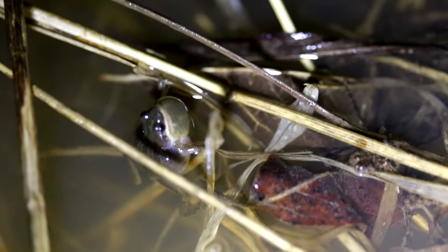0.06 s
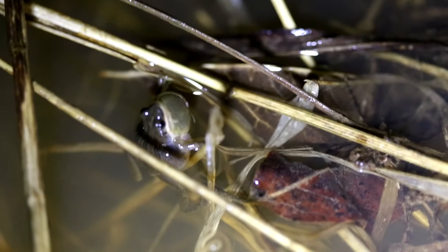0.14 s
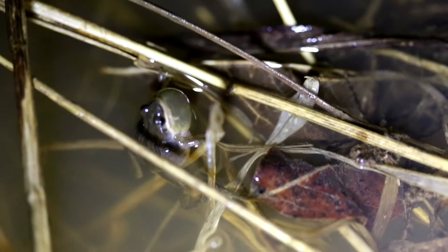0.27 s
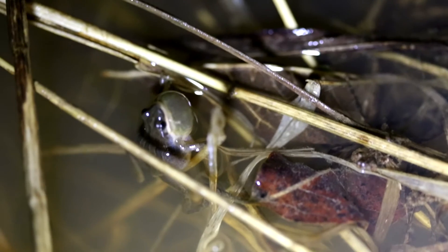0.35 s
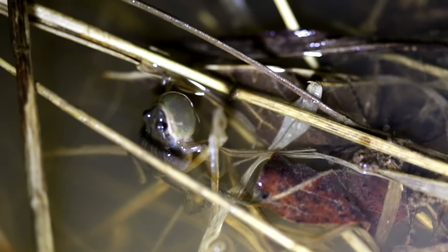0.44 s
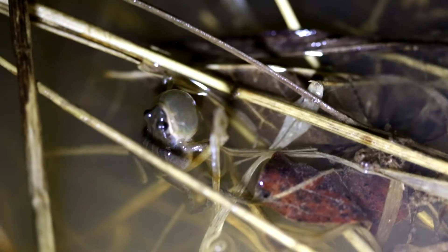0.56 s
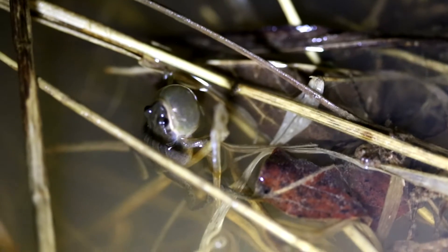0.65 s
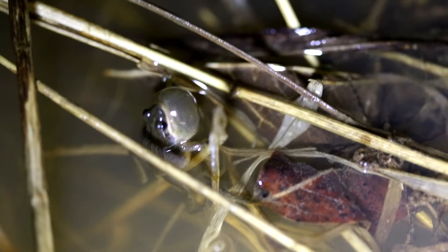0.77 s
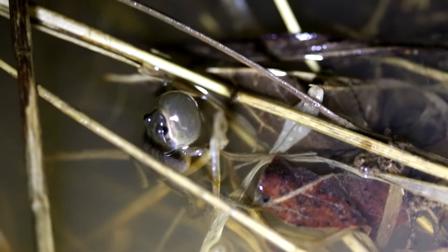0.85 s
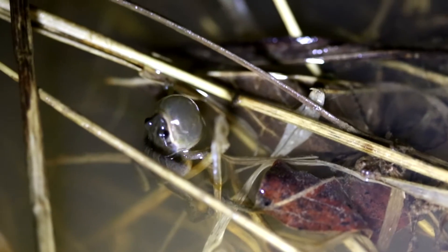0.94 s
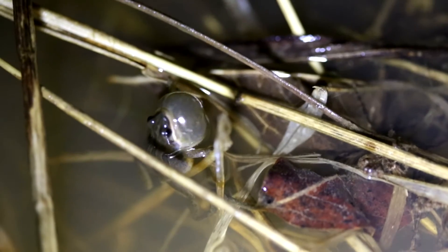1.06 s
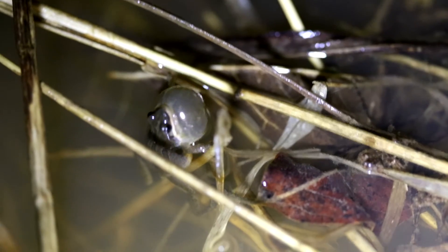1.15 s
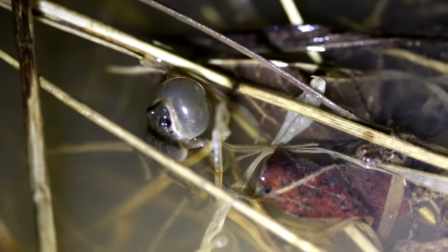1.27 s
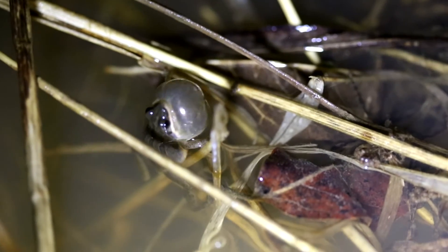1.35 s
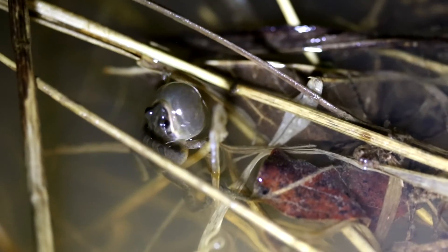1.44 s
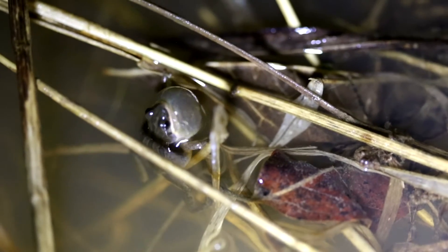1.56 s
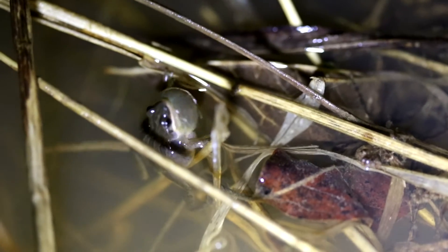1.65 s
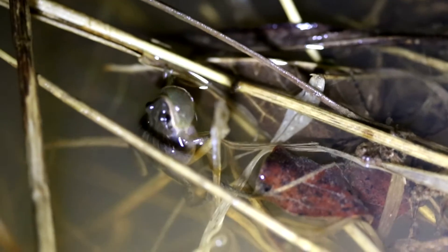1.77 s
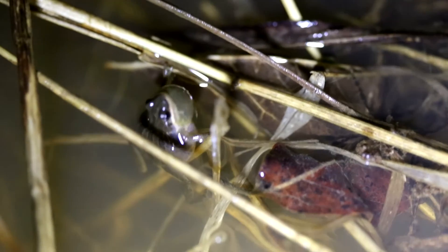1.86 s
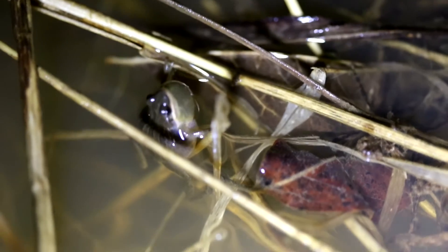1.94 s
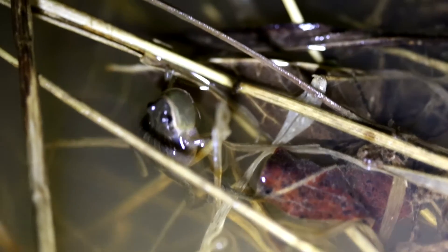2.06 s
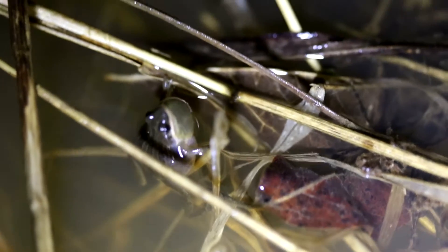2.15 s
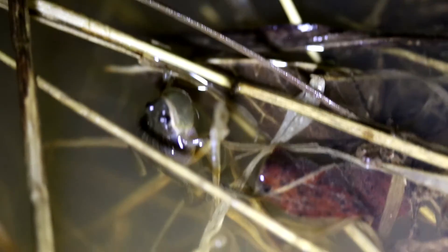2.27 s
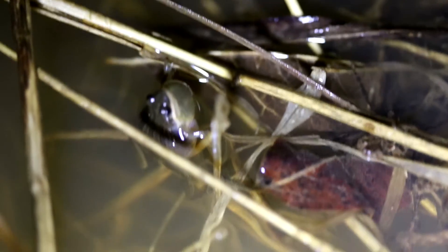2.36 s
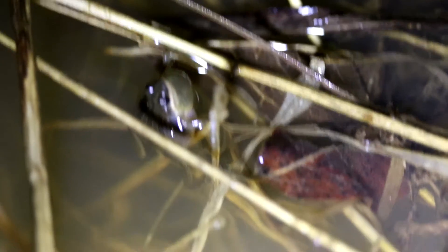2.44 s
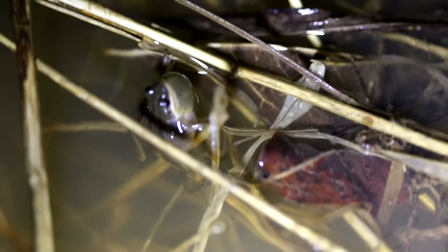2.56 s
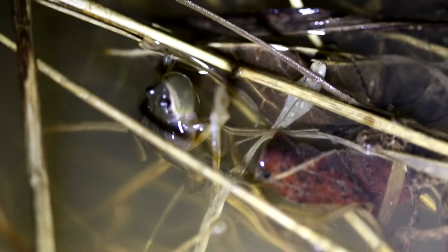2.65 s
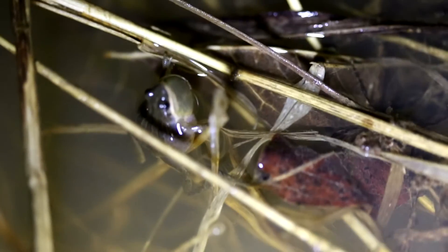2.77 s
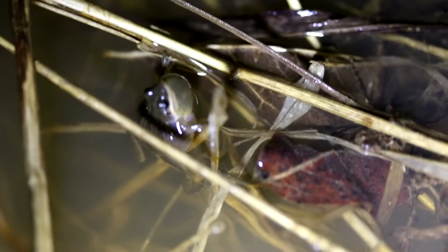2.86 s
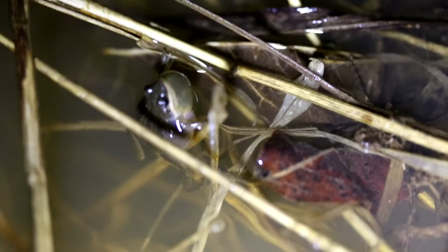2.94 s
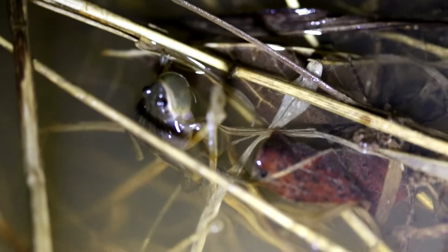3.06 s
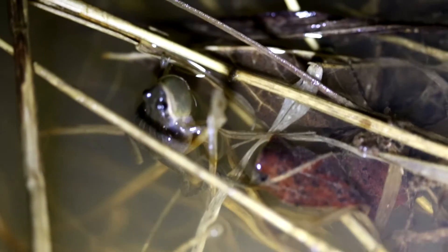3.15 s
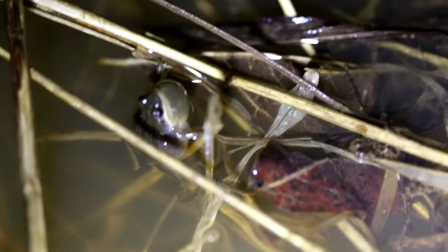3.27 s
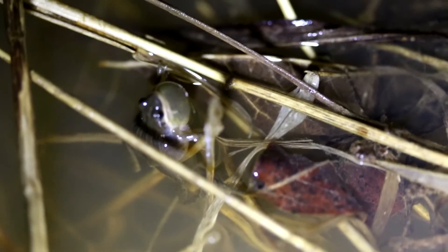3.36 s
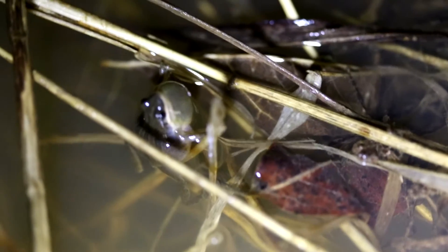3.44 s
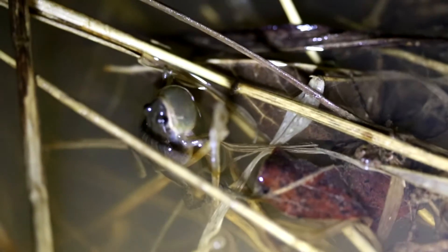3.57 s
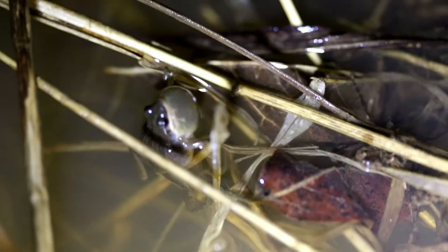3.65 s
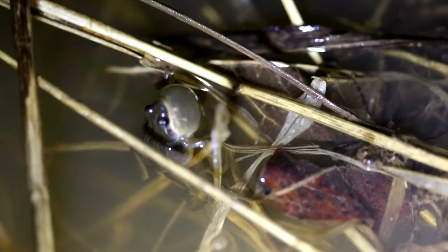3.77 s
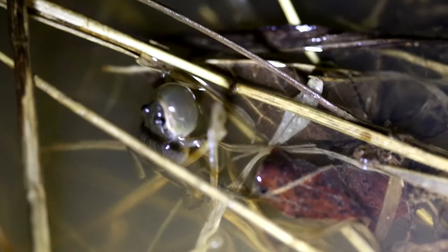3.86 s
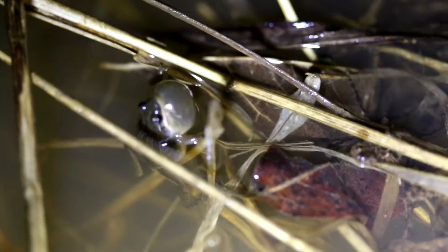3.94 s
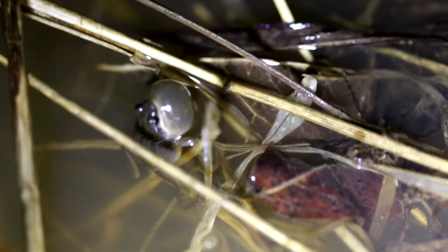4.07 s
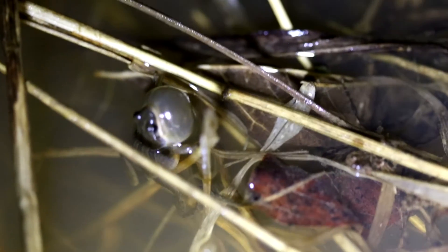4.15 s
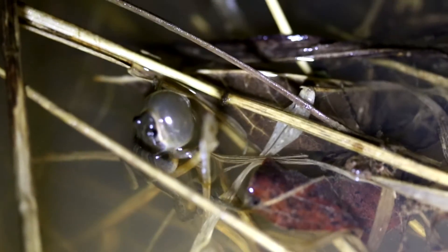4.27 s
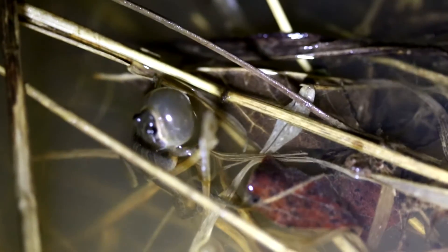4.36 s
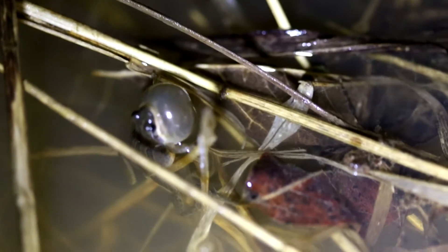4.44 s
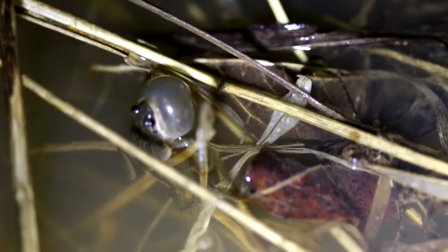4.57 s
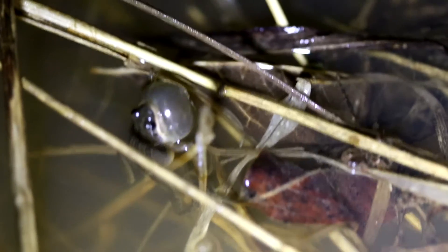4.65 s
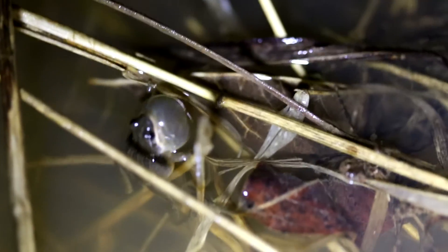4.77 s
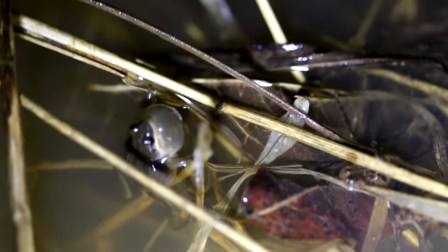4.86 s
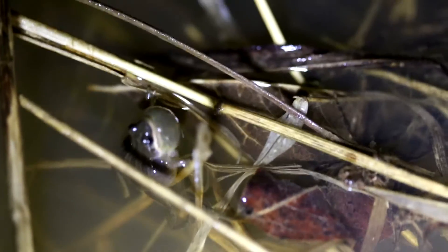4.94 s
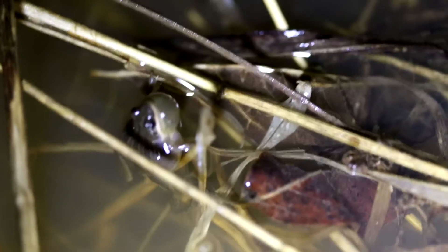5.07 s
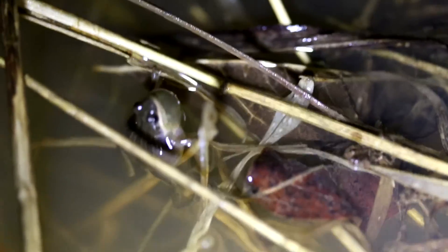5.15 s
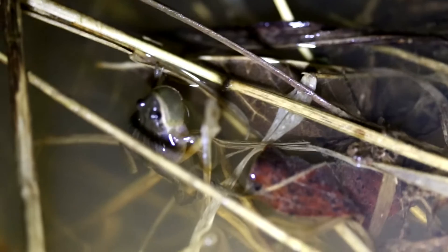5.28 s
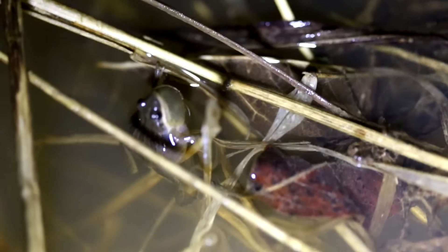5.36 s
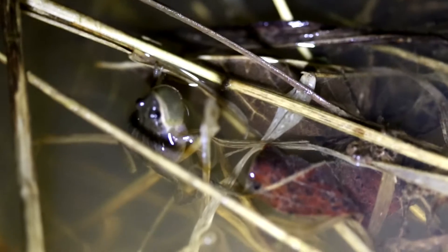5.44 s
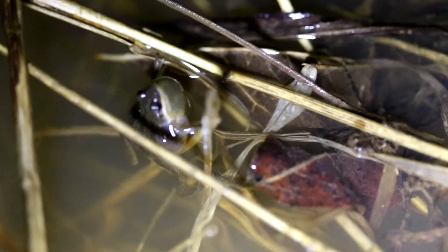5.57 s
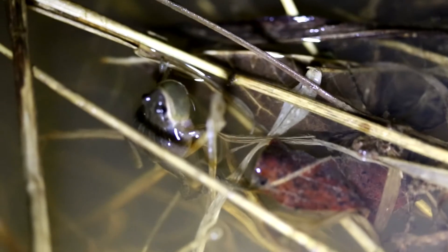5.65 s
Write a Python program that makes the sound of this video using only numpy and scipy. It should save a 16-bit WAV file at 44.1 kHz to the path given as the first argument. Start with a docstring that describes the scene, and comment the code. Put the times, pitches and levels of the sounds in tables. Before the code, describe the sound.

At a pond at night, one loud frog ratchets out two creaky rising trills while neighbours click and small peepers whistle behind.

```python
"""Night at a pond: a chorus frog close to the microphone gives two slowing trills of clicks, each click
a brief buzz of vocal folds with a ringing sac. Neighbours a few metres off click their own trills,
peepers whistle rising notes from gliding partials, and far clicks blur into a haze of shaped noise.
Light wind rumbles on the microphone, with one soft thump, and its electronics hiss."""
import sys
import numpy as np
from scipy import signal
from scipy.io import wavfile
from scipy.ndimage import uniform_filter1d

SR = 44100
rng = np.random.default_rng(int(sys.argv[2]) if len(sys.argv) > 2 else 0)


def master(y):
    """Save y as 16-bit WAV."""
    cut = np.clip(np.atleast_2d(y).T, -1, 1)
    pcm = np.round(cut * 32767)  # scale
    wavfile.write(sys.argv[1], SR, pcm.astype(np.int16))


N = 251811


def gain_of(db):
    """Amplitude factor of a level in dB."""
    return 10 ** (np.asarray(db) / 20)


def evened(x):
    """The signal scaled to rms 1."""
    return x / np.sqrt(np.mean(x ** 2) + 1e-20)


def phase_of(hz):
    """Phase in radians of an oscillator that follows a frequency track."""
    return 2 * np.pi * np.cumsum(hz) / SR


def read(points, hz):
    """Values of a curve of (Hz, dB) points, straight over log frequency."""
    point_hz, value = np.transpose(points)
    return np.interp(np.log(hz + 1), np.log(point_hz + 1), value)


def add(mix, s, sound):
    """Lay a sound into the mix from s seconds on, cut at the end of the mix."""
    part = mix[max(round(s * SR), 0):][:len(sound)]
    part += sound[:len(part)]


def noise(spectrum, size, patchy_db):
    """Noise of rms 1 from random short-time spectra, its level drifting in patches of time and pitch."""
    frames = 4 * N // size + 5
    hz = np.fft.rfftfreq(size, 1 / SR)
    real, imaginary, patches = rng.standard_normal((frames, len(hz), 3)).T
    patches = uniform_filter1d(patches, size=5, axis=0)  # across frequency
    patches = evened(uniform_filter1d(patches, size=6, axis=1))  # across time
    level_db = read(spectrum, hz)[:, None] + patchy_db * patches
    z = (real + 1j * imaginary) * gain_of(level_db)
    return evened(signal.istft(z, nperseg=size, noverlap=3 * size // 4)[1][:N])


def hiss():
    """Steady noise of the microphone's electronics."""
    # Spectrum of the hiss. Each row: frequency in Hz, relative density in dB per Hz.
    spectrum = [(150, 14), (300, 8), (700, 8.4), (9000, 3), (13000, 4.5), (16000, 4)]
    return gain_of(-67.5) * noise(spectrum, size=512, patchy_db=2.0)


def wind():
    """Lumpy low rumble of moving air on the microphone, following the gusts."""
    # Spectrum of the rumble. Each row: frequency in Hz, relative density in dB per Hz.
    spectrum = [(11, -28.5), (18, 0), (38, 7.5), (90, 6.5), (121, -3), (217, -20.5), (400, -33),
                (520, -61.5), (880, -120)]
    # Strength of the gusts. Each row: time in seconds, level in dB.
    gusts = [(0.0, -60), (0.301, -73), (1.3, -65), (1.99, -59), (2.05, -66), (2.48, -58), (2.58, -75.5),
             (2.65, -57.5), (3.04, -54), (3.07, -64.5), (4.71, -62), (5.01, -56.5), (5.14, -65.5),
             (5.45, -65.5), (5.52, -53.5), (5.66, -62), (5.71, -61)]
    gust_db = np.interp(np.arange(N) / SR, *np.transpose(gusts))
    return noise(spectrum, size=1024, patchy_db=5.5) * gain_of(gust_db)


def thump():
    """One soft low thump: a decaying sine that falls in pitch."""
    # One row: level in dB, start in Hz, end in Hz, 60 dB decay time in seconds.
    knock = (-46, 280, 57, 0.25)
    db, high_hz, low_hz, t60 = knock
    out, t = np.zeros(N), np.arange(6000) / SR
    hz = low_hz + (high_hz - low_hz) * np.exp(-t / .018)
    level = gain_of(db - 60 * t / t60) * (1 - np.exp(-t / 0.0038))
    add(out, 5.498, level * np.sin(phase_of(hz)))
    return out


def haze():
    """The farthest frogs, blurred into patchy noise around the pitch of their sacs."""
    # Spectrum of the haze. Each row: frequency in Hz, relative density in dB per Hz.
    spectrum = [(410, -81), (700, -44), (934, -57), (1170, -18), (1400, -18), (2320, -36), (2720, 8.5),
                (2900, 6), (3400, -12), (3910, -28), (4840, -18.5), (9000, -47.5), (11700, -68.5),
                (19800, -120)]
    return gain_of(-47.5) * noise(spectrum, size=256, patchy_db=5.0)


def click(db, hz, low_db, high_db, hold, luck, taut_hz, ring_t60, mouth_hz):
    """The folds vibrate a few cycles, gliding from taut_hz to half the ring; the sac rings on at hz."""
    # Partials of the folds. Each row: multiple of the fold rate, relative level in dB.
    partials = [(3, -4.5), (4, -16), (5, -30.5), (6, -39.5), (7, -47), (8, -34.5), (9, -42)]
    t = np.arange(1300) / SR
    excess_hz = taut_hz - hz / 2
    taut = np.exp(-(t / (hold + 0.000069)) ** 2)
    turns = phase_of(hz / 2 + excess_hz * taut)
    ring = phase_of(hz + 1.5 * excess_hz * np.exp(-t / (0.00027 + 0.3 * hold)))
    after = np.maximum(t - hold, 0)
    folds = (1 - np.exp(-t / 0.00051)) * gain_of(-60 * after / 0.0044)
    sac = (1 - np.exp(-t / 0.00034)) ** 1.82 * gain_of(-60 * after / ring_t60)

    # the balance of overtones varies with luck
    overtones = 0
    for (multiple, partial_db), w in zip(partials, luck):
        overtones = overtones + gain_of(partial_db + 6 * (w - .5)) * np.sin(multiple * turns + 2 * np.pi * w)
    # wet folds flutter: the overtones are rough
    rough = 1 + .5 * np.sin(2 * np.pi * (700 * t * (1 + luck[1]) + luck[2]))
    # the folds part with a dry snap, falling from 6200 to 3600 Hz
    snap_hz = 6200 - 2600 * np.minimum(t / 0.0004, 1)
    snap = .5 * np.exp(-t / 0.00037) * np.sin(phase_of(snap_hz))
    # the mouth cavity knocks briefly
    mouth = 0.61 * np.exp(-t / 0.0019) * np.sin(2 * np.pi * mouth_hz * t + 2.47)
    mouth = mouth * (1 - np.exp(-t / 0.00056))

    low = gain_of(low_db - 2.0) * (folds * np.sin(turns) + mouth)
    high = gain_of(high_db) * (folds * rough * overtones + snap)
    body = sac * np.sin(ring) + low + high
    # a body this small sends out little below 994 Hz
    throat = signal.butter(6, 994, "high", fs=SR, output="sos")
    return gain_of(db) * signal.sosfilt(throat, body)


def far_frogs():
    """Small clicks at random times from 24 distant frogs, each with its own sac."""
    clicks_per_s = 170
    louder_db = 2.2 * np.minimum(rng.exponential(1, N), 2.5)
    size = gain_of(louder_db) * (rng.random(N) < clicks_per_s / SR)
    frog, out = rng.integers(0, 24, N), np.zeros(N)
    for k, hz in enumerate(np.linspace(2620, 3520, num=24)):
        voice = click(0, hz, low_db=-15, high_db=-14, hold=.0016, luck=rng.random(7),
                      taut_hz=.55 * hz, ring_t60=.018, mouth_hz=rng.uniform(1100, 1900))
        out += signal.oaconvolve(size * (frog == k), voice)[:N]
    return gain_of(-48) * evened(out)


def whistle(odd_db, fourth_db, start, end, start_hz, end_hz, db):
    """A clear rising note, the second partial of the folds, swelling towards its end."""
    seconds = end - start
    u = np.linspace(0, 1, int(seconds * SR))
    # the middle lies 15.43 Hz above a straight climb
    pitch = start_hz + (end_hz - start_hz) * u + 15.43 * np.sin(np.pi * u)
    waver_db = evened(uniform_filter1d(rng.standard_normal(len(u)), size=900))
    turns = phase_of(pitch / 2) + 2 * np.pi * rng.random()
    # odd partials grow up to 2800 Hz; the fourth fades above 2710 Hz
    high = (pitch - 2800) / 300
    odd_gain = gain_of(odd_db + 4 * np.minimum(high, 0) + waver_db)
    odd = odd_gain * (.5 * np.sin(turns) + np.sin(3 * turns))
    fourth_gain = gain_of(fourth_db - 9 * np.maximum(high + .3, 0) + waver_db)
    tone = np.sin(2 * turns) + odd + fourth_gain * np.sin(4 * turns)
    # 11 ms fade in, 9.1 ms fade out
    edges = np.clip(np.minimum(u * seconds / 0.011, (1 - u) * seconds / 0.0091), 0, 1)
    swell = gain_of(db + 3.2 * (u - .5) + waver_db)
    return np.sqrt(2) * swell * edges * tone  # sqrt(2): the level is an rms


def peepers():
    """Whistles of three voices, each with its own strength of partials."""
    # Voices of the peepers. Each row: odd partials in dB re whistle, fourth partial in dB re whistle
    # (both before they shift with pitch), whistles. Each whistle: start in seconds, end in seconds,
    # start in Hz, end in Hz, rms level in dB before swell and fades.
    voices = [(-27.5, -30.5, [(.78, 1.07, 2500, 3070, -35), (2.362, 2.67, 2530, 3020, -42.5),
              (2.73, 3.02, 2530, 3120, -37.5), (3.995, 4.285, 2555, 3110, -38)]),
              (-33.5, -30.5, [(0, .165, 2510, 2763, -36.5), (1.66, 1.84, 2490, 2820, -34.5),
              (2.545, 2.73, 2470, 2810, -35.5), (3.375, 3.56, 2470, 2790, -35),
              (4.2, 4.395, 2450, 2819, -35.6), (5.165, 5.365, 2495, 2815, -35.5)]),
              (-39.5, -44.5, [(0, .14, 2780, 2983, -41), (.53, .67, 2510, 2803, -41.5),
              (.58, .67, 2770, 3000, -47), (.81, .96, 2690, 3020, -39), (1.25, 1.37, 2720, 2950, -42.5),
              (1.44, 1.58, 2535, 2813, -41), (1.66, 1.78, 2720, 2942, -47), (2.29, 2.37, 2375, 2455, -62),
              (3.22, 3.38, 2535, 2884, -43), (3.62, 3.78, 2725, 3046, -44), (4.43, 4.55, 2690, 2955, -44),
              (4.46, 4.61, 2640, 2957, -45.5), (4.645, 4.79, 2505, 2773, -42.3),
              (4.65, 4.85, 2680, 2980, -43), (4.86, 4.98, 2680, 2898, -44.5),
              (5.39, 5.54, 2640, 2950, -46.5), (5.57, 5.71, 2710, 2995, -45),
              (5.595, 5.71, 2540, 2800, -42.5)])]
    out = np.zeros(N)
    for odd_db, fourth_db, whistles in voices:
        for row in whistles:
            add(out, row[0], whistle(odd_db, fourth_db, *row))
    return out


def neighbours():
    """Clicks of frogs a few metres off; the grass dulls the top."""
    # Trills of the neighbours, the ring moving evenly from first to last click. Each row: first ring
    # in Hz, last ring in Hz, fundamental in dB re ring (before a 2 dB cut in click), overtones in dB
    # re ring, clicks. Each click: start in seconds, level in dB (before a 3 dB lift).
    trills = [ (3260, 3355, -16.5, -16.5, [(.106, -21.5), (.2191, -21.5), (.314, -22)]),
              (3250, 3330, -33, -12, [(.087, -29.5), (.2064, -30.5)]),
              (3200, 3503, -12, -10, [(.136, -31.5), (.2495, -34), (.4805, -28.5), (.6117, -31.5)]),
              (3260, 3370, -6, -28, [(.5446, -36), (.6252, -32), (.7096, -32), (.7967, -30.5), (.89, -31),
              (1.09, -29), (1.206, -28)]), (3260, 3490.5, -10, -12.5, [(1.1729, -32.5), (1.291, -32),
              (1.4214, -27.5), (1.5439, -29.5), (1.6475, -31)]),
              (2805.5, 2771.7, -11.5, -11.5, [(1.3235, -29.5), (1.3858, -33), (1.4819, -31),
              (1.611, -30.5)]), (3160, 3330, -17.5, -12.5, [(1.496, -29), (1.5685, -29), (1.639, -29),
              (1.7132, -28.5), (1.791, -29.5)]), (3020, 3520, -18.5, -14.5, [(1.5873, -34), (1.6654, -28.5),
              (1.75, -28), (1.838, -28), (1.9328, -29), (2.1416, -26.5), (2.2584, -26.5), (2.3748, -28),
              (2.4835, -31.5)]), (2959.9, 2960, -13, -9, [(1.627, -32), (1.694, -31), (1.7824, -26.5),
              (1.988, -29)]), (2780, 3174, -13, -13, [(1.728, -26.5), (1.8002, -30), (1.8804, -26.5),
              (1.9552, -29), (2.118, -26), (2.2086, -25.5), (2.3009, -26.5), (2.4009, -26), (2.5064, -25),
              (2.6181, -25), (2.7319, -23.5), (2.842, -24), (2.9431, -25)]),
              (3410, 3470, -15.5, -15, [(1.815, -29.5), (1.9074, -29), (2.008, -30), (2.106, -28.5),
              (2.1817, -32.5)]), (3140, 3450, -20, -10, [(1.8638, -24), (1.948, -22), (2.0336, -19),
              (2.122, -22), (2.2175, -20.5), (2.311, -21), (2.4121, -21), (2.5203, -21), (2.631, -20.5),
              (2.7345, -20), (2.8128, -22)]), (3139.2, 3240, -8, -4, [(2.229, -34), (2.3326, -35)]),
              (3000, 3255, -14, -13.5, [(2.6022, -39), (2.6934, -34), (2.7924, -31), (2.897, -29.5),
              (3.0123, -25), (3.1283, -30), (3.2536, -27), (3.3683, -30)]),
              (2837, 3320, -14.5, -15, [(2.9366, -34), (3.0051, -33), (3.078, -28), (3.156, -26.5),
              (3.2387, -26), (3.418, -23.5), (3.5164, -22.5), (3.6225, -22.5), (3.7354, -24.5),
              (3.8557, -22), (4.063, -18.5)]), (3070, 3360, -13, -10.5, [(3.3415, -31.5), (3.4347, -29),
              (3.6381, -31), (3.755, -32.5), (3.8774, -32), (4.001, -34.5), (4.1665, -30)]),
              (3090, 3390, -18, -11.5, [(3.3567, -31), (3.4502, -29.5), (3.5555, -30), (3.6679, -30),
              (3.7916, -27.5), (3.9248, -28)]), (3220, 3720, -3, -20.5, [(3.5798, -38), (3.6567, -38),
              (3.8162, -35.5), (3.9008, -34), (3.99, -35.5), (4.0859, -34), (4.4125, -33.5),
              (4.5095, -35)]), (3037.8, 3280, -14, -15, [(4.5523, -30.5), (4.654, -28), (4.7658, -29)]),
              (2780, 2900, -12, -13.5, [(4.7262, -30), (4.8037, -31), (4.887, -27.5), (4.9758, -27.5),
              (5.0701, -28.5)]), (3269.2, 3516.8, -13, -11.5, [(4.6288, -34.5), (4.6993, -34.5),
              (4.773, -32), (4.8536, -29.5), (4.937, -28.5), (5.0152, -30), (5.1242, -27), (5.23, -28),
              (5.3382, -29.5), (5.4401, -31.5)]), (2960, 3400, -15.5, -12, [(4.9542, -40), (5.028, -27.5),
              (5.1002, -32.5), (5.1705, -26.5), (5.2487, -27), (5.3246, -28), (5.404, -25.5),
              (5.4859, -29.5), (5.566, -29.5), (5.6513, -29)]), (2820, 3070, -14, -13, [(5.05, -31.5),
              (5.1983, -28), (5.2829, -25), (5.3591, -24.5), (5.448, -23.5), (5.5374, -23.5),
              (5.6299, -24.5)]), (3010, 3130, -19.5, -10.5, [(5.5097, -26.5), (5.5896, -26),
              (5.6734, -25)]), (3265.6, 3360, -13, -14, [(5.5221, -28), (5.6366, -27)])]
    out = np.zeros(N)
    for first_hz, last_hz, low_db, high_db, trill in trills:
        for (s, db), luck in zip(trill, rng.random((len(trill), 10))):
            hz = np.interp(s, [trill[0][0], trill[-1][0]], [first_hz, last_hz])
            sound = click(db, hz, low_db, high_db, hold=0.0018 + 0.00056 * luck[7], luck=luck,
                          taut_hz=hz * (0.471 + 0.072 * luck[8]), ring_t60=0.015,
                          mouth_hz=1100 + 500 * luck[9])
            add(out, s, sound)
    grass = signal.butter(1, 9000, fs=SR)
    return gain_of(3.0) * signal.lfilter(*grass, out)


def near_frog():
    """Trills close to the microphone: folds start tauter and hold longer click by click, bar the last hold."""
    # Two trills, one row per click. Each row: start in seconds, level in dB, sac ring in Hz.
    trills = [
        [(.0154, -22.5, 2790), (.067, -19, 2610), (.1288, -19.5, 2630), (.1934, -16, 2680), (.262, -13.5, 2720),
         (.3365, -13.5, 2730), (.4131, -11, 2710), (.4941, -10.5, 2726), (.581, -9.5, 2745),
         (.6731, -9.5, 2726), (.7703, -8, 2781), (.874, -8.5, 2780), (.98, -7, 2846), (1.0996, -6.5, 2878),
         (1.2174, -10, 3110), (1.2562, -17.5, 3200)],
        [(3.2118, -25.5, 2610), (3.2613, -17.5, 2654), (3.3259, -14.5, 2750), (3.391, -16.5, 2670),
         (3.46, -14.5, 2695), (3.5323, -12.5, 2710), (3.6118, -12, 2734), (3.6925, -10, 2751),
         (3.7784, -9, 2770), (3.8709, -8.5, 2780), (3.9693, -7, 2885), (4.0694, -7, 2820), (4.181, -7, 2880),
         (4.295, -7, 2930), (4.4202, -8.5, 2997), (4.5172, -12, 3310)],
    ]
    # The stems throw each click back. One row: delay in seconds, level in dB.
    echo = (0.0046, -26)
    echo_s, echo_db = echo
    out, t = np.zeros(N), np.arange(200) / SR
    for trill in trills:
        for (s, db, hz), luck in zip(trill, rng.random((len(trill), 7))):
            age = s - trill[0][0]  # seconds into the trill
            low_db = -17 - 0.4 * db  # the ring outgrows the fundamental in loud clicks
            hold, ring_t60 = 0.00049 + 0.0019 * age, 0.015  # s
            if s == trill[-1][0]:
                # a short last click: high ring that dies sooner, fuller fundamental
                hold, ring_t60, low_db = 0.0011, .01, low_db + 3.5
            sound = click(db, hz, low_db, high_db=-19, hold=hold, luck=luck,
                          taut_hz=1591 + 64 * age, ring_t60=ring_t60, mouth_hz=0.809 * hz - 1100)
            add(out, s, sound)
            add(out, s + echo_s, gain_of(echo_db) * sound)
            # the sac swells at each click: a low one-sided puff that grows faster than the click
            puff = np.sin(np.pi * np.minimum(t / 0.0015, 1)) ** 2
            add(out, s, gain_of(1.73 * db - 35.5) * puff)
    return out


def pond(x, t60):
    """Scatter from reeds and banks: sparse taps of random sign, dying away."""
    taps = np.zeros(SR // 4)
    at = np.arange(160, len(taps) - 20, 20)
    at = at + rng.integers(0, 20, len(at))
    taps[at] = rng.choice([-1., 1.], len(at)) * gain_of(-60 * at / SR / t60)
    taps = signal.lfilter([1], [1, -.6], taps)  # leaves take the treble
    return signal.fftconvolve(x, taps / np.linalg.norm(taps))[:N]


def stereo(mid):
    """Stereo: a faint phase-scrambled copy of the mid as side."""
    # Width of the stereo image. Each row: frequency in Hz, side in dB re mid.
    width = [(60, -27), (350, -7), (1400, -23), (2800, -28), (5500, -18), (14000, -19)]
    hz, _, z = signal.stft(mid, SR, nperseg=512)
    scramble = np.exp(2j * np.pi * rng.random(z.shape[::-1]).T)
    z = z * gain_of(read(width, hz)[:, None]) * scramble
    side = signal.istft(z, SR, nperseg=512)[1][:N]
    return np.array([mid + side, mid - side])


def scene():
    """The pond from its background to the near frog, heard in stereo."""
    background = hiss() + wind() + thump() + haze()
    others = far_frogs() + peepers() + neighbours()
    near = near_frog()
    wet = gain_of(-25.5) * pond(near, t60=0.049) + gain_of(-15) * pond(others, t60=0.04)
    return stereo(background + others + near + wet)


def record(dry):
    """The band limit: a steep low-pass at 15.8 kHz."""
    edge = signal.firwin(1023, 15800, window=("kaiser", 12), fs=SR)
    return signal.oaconvolve(dry, edge[None], "same")


dry = scene()
out = record(dry)
master(out)
```